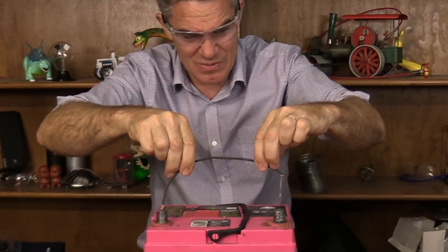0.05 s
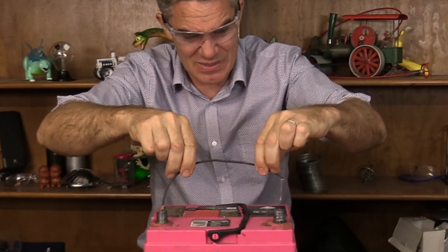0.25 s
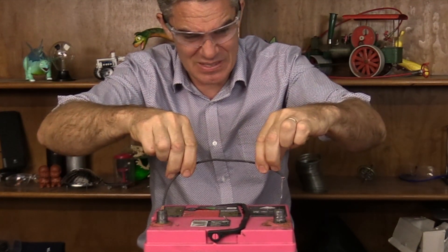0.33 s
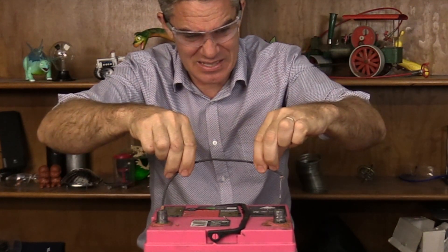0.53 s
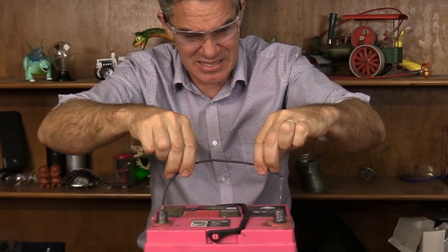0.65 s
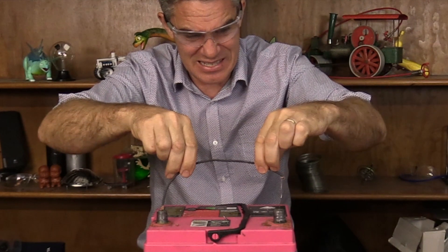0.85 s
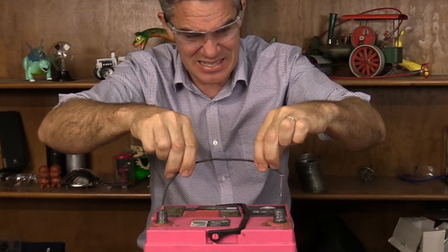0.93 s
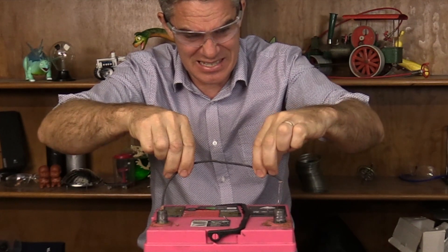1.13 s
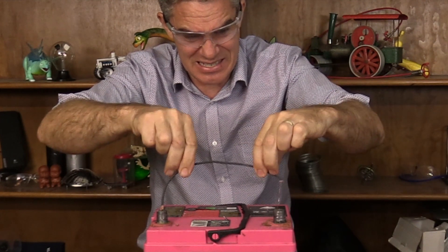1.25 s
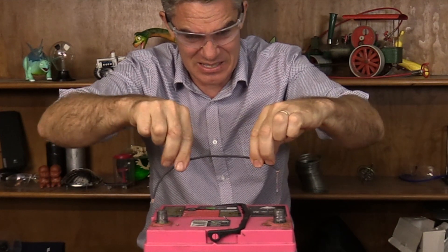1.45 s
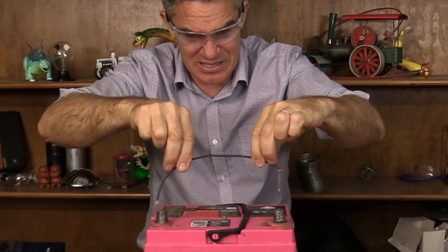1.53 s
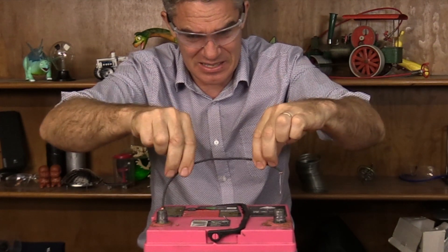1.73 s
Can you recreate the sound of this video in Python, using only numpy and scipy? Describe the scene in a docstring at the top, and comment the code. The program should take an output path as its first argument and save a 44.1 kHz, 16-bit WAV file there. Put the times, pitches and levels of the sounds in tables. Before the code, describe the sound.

A wire sparks on a car battery, crackling up to a sharp pop at 0.2 seconds, just after a soft knock on the case. Smaller sparks spit until about 0.4 seconds, with light taps and another knock. From 0.8 seconds the wire scrapes faintly on the posts, a stray spark snaps at 1.2, and a dull tap comes at 1.7, over a quiet workshop's low rumble.

```python
"""A wire held across a car battery sparks in a small, quiet workshop, over a low room rumble.
First the battery case knocks softly. At 0.2 s the arc crackles up to a pop of hot gas, then spits
a few single sparks while the wire taps a post and the case knocks again. From 0.8 s the wire
scrapes faintly on the posts, among light taps, one more knock and two stray sparks.
A last dull tap comes at 1.7 s. One microphone hears it all."""
import sys
import numpy as np
from scipy import signal
from scipy.fft import rfft, irfft
from scipy.io import wavfile

SR = 44100
rng = np.random.default_rng(int(sys.argv[2]) if len(sys.argv) > 2 else 0)


def log_audio(samples):
    """Write samples as a 16-bit WAV file to the path given in sys.argv[1]."""
    # one column per channel
    frames = np.atleast_2d(samples).T
    # limit to full scale, then quantise
    limited = np.clip(frames, -1, 1)
    pcm = np.round(limited * 32767).astype(np.int16)
    wavfile.write(sys.argv[1], SR, pcm)


N = 79380
T = np.arange(N) / SR

# Room tone before its ends are rolled off. Each row: frequency in Hz, relative level in dB.
ROOM_TONE_COLOUR = [(15, -29.5), (25, 1.5), (64, -2), (99, -9), (313, -21.5), (349, -23), (552, -30),
                    (945, -32), (1020, -30), (1110, -34), (1270, -32.5), (1410, -35.5), (15500, -43.5)]
ROOM_TONE_DB, SWELL_DB, AIR_HZ = -48.5, -1, 9300  # the room tone fades above AIR_HZ
# Faint steady hum. Each row: frequency in Hz, level in dB.
HUM_TONES = [(62, -58.5), (122, -62), (300, -69)]
# Hiss of each input channel. Each row: frequency in Hz, relative level in dB.
CHANNEL_HISS_COLOUR = [(40, 4), (200, 8.5), (700, 6), (3000, 0.5), (15000, 2.5)]
HISS_DB, TOP_HZ = -66, 15900
# Workshop reverb. Each row: band centre in Hz, level against the dry sound in dB, t60 in seconds.
REVERB_BANDS = [(120, -6, 0.46), (378, -2.5, 0.55), (900, 1, 0.26), (1700, -4, 0.34), (3520, -2, .29),
                (6650, -8, 0.29), (14100, -7, 0.19)]
PRE_DELAY_S, EARLY_DB, EARLY_DECAY_S = 0.003, -3, 0.016
# Echoes off the battery lid and the hands. Each row: delay in seconds, gain.
LID_AND_HAND_ECHOES = [(.00018, -0.36), (.00076, 0.49), (.0011, -0.18), (.0031, 0.24)]
# Faint ringing behind the sparks. Each row: frequency in Hz, gain in dB, t60 in seconds.
AFTER_RING_MODES = [(692, -53, .12), (1448, -54, .16), (2461, -56, .15), (3003, -57, .14), (3237, -58, .14),
                    (3522, -60, .15), (3767, -57, .2)]

# Wire scrapes. Each row: start in seconds, length in seconds, level in dB, band centre in Hz.
WIRE_SCRAPES = [(0.8, 0.016, -64, 3420), (0.837, 0.0074, -61, 3500), (0.869, 0.027, -60, 3350),
                (0.9114, 0.0082, -51, 3370), (0.949, 0.009, -58.5, 3570), (1.068, 0.016, -58.5, 4900),
                (1.351, 0.025, -62.5, 3270), (1.526, 0.0049, -63.5, 2800)]
SCRAPE_WIDTH = 0.26  # bandwidth as a share of the centre
# Knocks on the case. Each row: start in seconds, strength in dB, low-pass cutoff in Hz,
# boost or cut of the two lowest modes in dB.
CASE_KNOCKS = [(.052, -41, 2020, -1.5), (.064, -42.5, 510, 8.5), (.422, -42.5, 1300, -3),
               (.429, -42, 950, 3), (.956, -57, 1800, -8)]
# Resonances of the case. Each row: frequency in Hz, relative level in dB, t60 in seconds.
BATTERY_CASE_MODES = [(276, -3.5, 0.085), (381, 1.5, 0.059), (685, 2, 0.023), (1007, -3, .02),
                      (1243, 0.5, 0.037), (2040, -6.5, 0.022)]
GRIT_DB, GRIT_LOW_HZ = 5.5, 503
# Wire taps on a post. Each row: start in seconds, strength in dB, pitch in Hz, low-pass cutoff in Hz.
WIRE_TAPS = [(0.3844, -29.5, 1644, 4300), (.4744, -32.5, 1392, 3840), (.9122, -49.5, 1120, 3000),
             (1.367, -51.5, 790, 2000), (1.7002, -41.5, 730, 1480)]
# Resonances of the wire. Each row: ratio to the pitch, relative level in dB, cycles to fade by 60 dB.
WIRE_MODES = [(1.034, 0.5, 24), (1.1, -12, 39), (1.4, -5, 11), (2.13, -7.5, 26), (2.52, -9, 28)]

# Dull blast of hot gas as the arc peaks. Each row: frequency in Hz, relative level in dB.
GAS_BLAST_COLOUR = [(60, -18), (130, -10), (240, -20.5), (420, -4), (680, -0.5), (950, -12), (1400, -1),
                    (2200, -8.5), (6000, -25)]
BLAST_DB, BLAST_DECAY_S = -2.5, 0.0062
POP_S, POP_RISE_S, POP_SUCK_S, POP_DB = 0.2222, 0.0008, 0.00407, -27
THUMP_HZ, THUMP_DB, THUMP_T60_S = 126, -26.5, 0.07
# Bright tone of a discharge. Each row: frequency in Hz, relative level in dB.
DISCHARGE_COLOUR = [(150, -16), (400, -15), (800, -7.5), (1400, -4), (2000, -6.5), (3100, 2.5), (4300, -2),
                    (5300, -0.5), (6200, 0), (8500, 2), (10800, -5), (13300, 5), (16000, -4.5)]
# Single sparks. Each row: start in seconds, strength in dB, sizzle decay in seconds, brightness 0 to 1.
SINGLE_SPARKS = [(.2132, 0, 0.000042, .1), (0.239, -16, .001, 0.1), (0.2478, -16, .0005, .3),
                 (.256, -16.5, .0005, 0.2), (.2663, -16, 0.00036, 0.1), (.3011, -18, .0006, 0.6),
                 (.379, -10, 0.00013, 0.1), (0.3969, -12.5, 0.0002, 0), (0.398, -10.5, 0.00036, 0.5),
                 (0.4002, -7.5, 0.00039, 0.44), (.4074, -14.5, .0007, .2), (.4157, -18, .0003, .6),
                 (0.908, -37, .001, .1), (1.213, -19.5, 0.000078, 0.1)]
# Surges of the arc. Each row: start in seconds, length in seconds, level in dB.
ARC_SURGES = [(0.2079, 0.0039, -23), (0.2129, 0.003, -15), (0.215, 0.0037, -19.5), (0.22, .0024, -14),
              (0.2224, 0.005, -25), (.227, .011, -33)]
ARC_CLICKS_PER_S, ARC_SCATTER_DB = 5000, 2.5


def undb(db):
    """Decibels to gain."""
    return 10 ** (np.asarray(db) / 20)


def unit(x):
    """Scale to unit energy."""
    return x / np.sqrt(np.sum(x ** 2) + 1e-18)


def convolve(x, response):
    """Pass a sound through a response."""
    return signal.fftconvolve(x, response)[:N]


def at(x, start):
    """Delay a sound to its start time in seconds."""
    return np.concatenate([np.zeros(max(int(start * SR), 0)), x])[:N]


def lowpass(x, hz, order=2):
    """Dull a sound above the cutoff."""
    return signal.sosfilt(signal.butter(order, hz, fs=SR, output="sos"), x)


def bin_hz(size):
    """Frequencies of a spectrum, kept at 1 Hz or more for a log scale."""
    return np.maximum(np.arange(size // 2 + 1) * SR / size, 1)


def eq_curve(freqs, points):
    """Gains along a curve drawn through (Hz, dB) points."""
    hz, db = np.array(points, float).T
    return undb(np.interp(np.log(freqs), np.log(hz), db))


def colour(x, points, size=8192):
    """Minimum-phase EQ of unit energy through (Hz, dB) points."""
    cepstrum = irfft(np.log(eq_curve(bin_hz(size), points)))
    cepstrum[1:size // 2] *= 2
    cepstrum[size // 2 + 1:] = 0
    response = irfft(np.exp(rfft(cepstrum)))
    return convolve(x, unit(response))


def clicks(per_s, scatter_db):
    """Random clicks of scattered size and either sign."""
    fires = rng.random(N) < per_s / SR
    return fires * rng.choice([-1, 1], N) * undb(scatter_db * rng.standard_normal(N))


def ring(hz, t60):
    """One struck mode, fading by 60 dB in t60 seconds."""
    return np.sin(2 * np.pi * hz * T) * np.exp(-np.log(1000) * T / t60)


def room_tone():
    """The bed: a gently swelling rumble with soft air and a faint hum."""
    freqs = bin_hz(N)
    sub_cut = np.minimum(freqs / 30, 1) ** 2
    shape = eq_curve(freqs, ROOM_TONE_COLOUR) * sub_cut / np.hypot(1, freqs / AIR_HZ)
    noise = irfft(rfft(rng.standard_normal(N)) * shape, N)
    bed = unit(noise) * np.sqrt(N) * undb(ROOM_TONE_DB)
    rumble = signal.sosfiltfilt(signal.butter(2, 150, fs=SR, output="sos"), bed)
    swell = undb(SWELL_DB * signal.resample(rng.standard_normal(12), N))
    hum = sum(np.sqrt(2) * undb(db) * np.sin(2 * np.pi * (hz * T + rng.random())) for hz, db in HUM_TONES)
    return bed + rumble * (swell - 1) + hum


def workshop_reverb(x):
    """Strong early reflections off the shelves, then a short tail that dulls as it fades."""
    log_freqs = np.log(bin_hz(N))
    log_centres = np.log([row[0] for row in REVERB_BANDS])
    reflections = clicks(per_s=7000, scatter_db=3.4)
    spectrum = rfft(reflections) / np.std(reflections)
    early_lift = 1 + undb(EARLY_DB) * np.exp(-T / EARLY_DECAY_S)
    tail = np.zeros(N)
    for solo, (_, db, t60) in zip(np.eye(len(REVERB_BANDS)), REVERB_BANDS):
        band = irfft(spectrum * np.interp(log_freqs, log_centres, solo), N)
        envelope = unit(early_lift * np.exp(-np.log(1000) * T / t60))
        tail += undb(db) * band * envelope
    return convolve(x, at(tail, PRE_DELAY_S))


def with_near_echoes(x):
    """Each crack plus its echoes, thrown back by the lid and the hands within a few milliseconds."""
    echoes = sum(gain * at(x, delay) for delay, gain in LID_AND_HAND_ECHOES)
    energy = 1 + sum(gain ** 2 for _, gain in LID_AND_HAND_ECHOES)
    return (x + echoes) / np.sqrt(energy)


def after_ring(x):
    """The cracks set a few weak resonances ringing."""
    return convolve(x, sum(undb(db) * ring(hz, t60) for hz, db, t60 in AFTER_RING_MODES))


def wire_scrapes():
    """The wire end catches and slips on the post in tiny gritty steps."""
    out = np.zeros(N)
    for start, length, db, hz in WIRE_SCRAPES:
        stroke = np.sin(np.pi * np.sqrt(np.minimum(T / length, 1)))
        slips = clicks(per_s=3500, scatter_db=4.8) * stroke
        rasp = signal.lfilter(*signal.iirpeak(hz, 1 / SCRAPE_WIDTH, fs=SR), slips)
        out += at(unit(rasp) * np.sqrt(length * SR) * undb(db), start)
    return out


def case_knocks():
    """The case rings with a little contact grit; a softer contact leaves out the high modes."""
    out = np.zeros(N)
    low_cut = signal.butter(2, GRIT_LOW_HZ, "high", fs=SR, output="sos")
    for start, db, cutoff_hz, bass_db in CASE_KNOCKS:
        body = sum(undb(mode_db + bass_db * (k < 2)) * ring(hz, t60)
                   for k, (hz, mode_db, t60) in enumerate(BATTERY_CASE_MODES))
        burst = rng.standard_normal(N) * np.exp(-T / 0.0048)
        grit = undb(GRIT_DB) * signal.sosfilt(low_cut, burst)
        out += at(undb(db) * lowpass(body + grit, cutoff_hz), start)
    return out


def wire_taps():
    """The wire, damped by the fingers, rings briefly against a post; its pitch depends on the grip."""
    out = np.zeros(N)
    for start, db, hz, cutoff_hz in WIRE_TAPS:
        clink = sum(undb(mode_db) * ring(hz * ratio, cycles / (hz * ratio))
                    for ratio, mode_db, cycles in WIRE_MODES)
        out += at(undb(db) * lowpass(clink, cutoff_hz, order=4), start)
    return out


def gas_pop():
    """Hot gas expands and collapses: a push, a longer suction and a short dull blast, while the battery lid
    rings with a low thump."""
    push = np.exp(-np.abs(T - POP_S) / POP_RISE_S) * (T < POP_S)
    suction = (T >= POP_S) & (T < POP_S + POP_SUCK_S)
    rebound = at(np.exp(-T / 0.0021), POP_S + POP_SUCK_S)
    pressure = lowpass(push - 0.41 * suction + 0.39 * rebound, hz=1100)
    thump = at(-ring(THUMP_HZ, THUMP_T60_S), POP_S)
    burst = unit(clicks(per_s=6000, scatter_db=1) * np.exp(-T / BLAST_DECAY_S))
    blast = colour(at(burst, POP_S - POP_RISE_S), GAS_BLAST_COLOUR)
    return undb(POP_DB) * pressure + undb(THUMP_DB) * thump + undb(BLAST_DB) * blast


def arc():
    """Dense discharges that come in surges, and lone sparks, each a crack with a short sizzle."""
    out = np.zeros(N)
    for start, length, db in ARC_SURGES:
        surge = clicks(ARC_CLICKS_PER_S, ARC_SCATTER_DB) * (T < length)
        out += at(unit(surge) * np.sqrt(length * SR) * undb(db), start)
    for start, db, decay, brightness in SINGLE_SPARKS:
        sizzle = clicks(per_s=9000, scatter_db=5.3) * np.exp(-T / decay)
        sizzle[0] = 1.56  # the opening crack
        spark = signal.lfilter([1, -brightness], [1], sizzle)  # tilt towards the treble
        out += at(unit(spark) * undb(db), start)
    return colour(out, DISCHARGE_COLOUR)


def scene():
    """One microphone feeds both channels: close sounds, reverb and room tone."""
    sparks = arc()
    pop_and_handling = gas_pop() + wire_taps() + case_knocks() + wire_scrapes()
    close = with_near_echoes(sparks) + after_ring(sparks) + pop_and_handling
    mono = close + workshop_reverb(sparks + pop_and_handling) + room_tone()
    return np.array([mono, mono])


def record(dry):
    """Each channel adds its own faint hiss, a little stronger in the bass; a steep filter cuts the top."""
    hiss = np.array([colour(rng.standard_normal(N), CHANNEL_HISS_COLOUR) for _ in dry])
    high_cut = signal.ellip(10, 0.2, 80, TOP_HZ, fs=SR, output="sos")
    return signal.sosfilt(high_cut, dry + undb(HISS_DB) * hiss)


dry = scene()
out = record(dry)
log_audio(out)
```